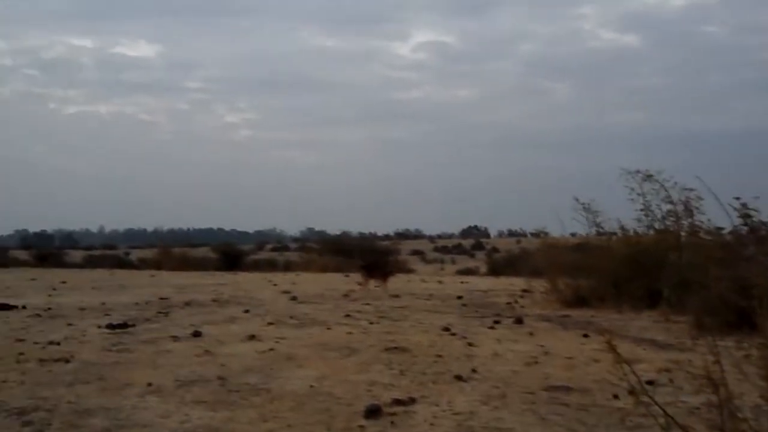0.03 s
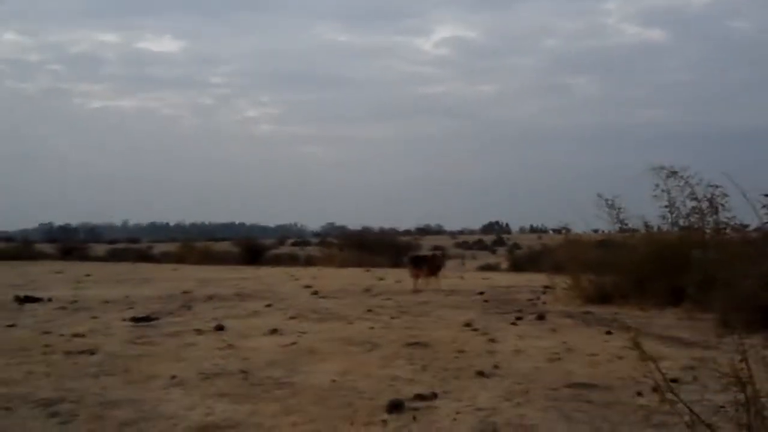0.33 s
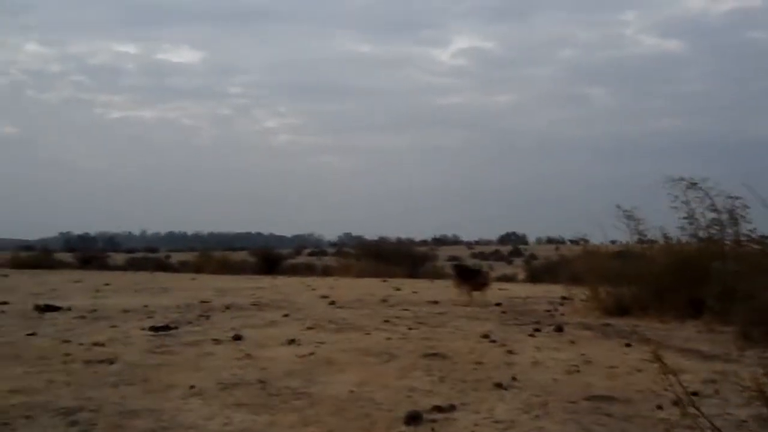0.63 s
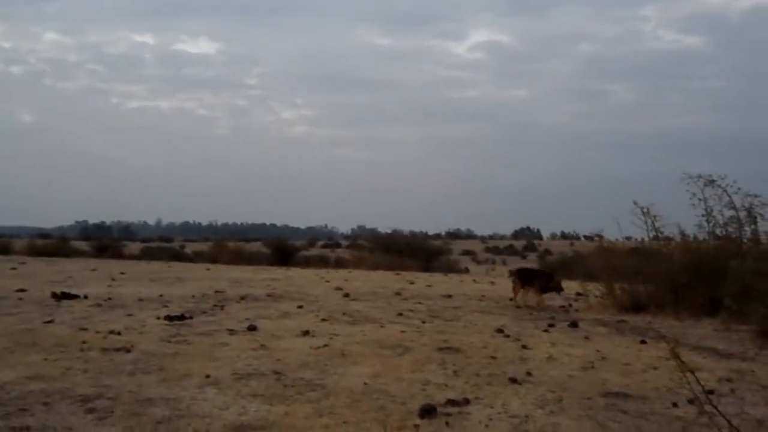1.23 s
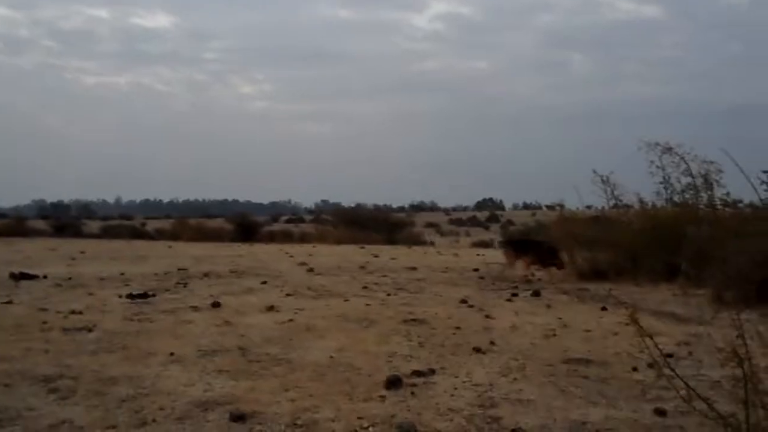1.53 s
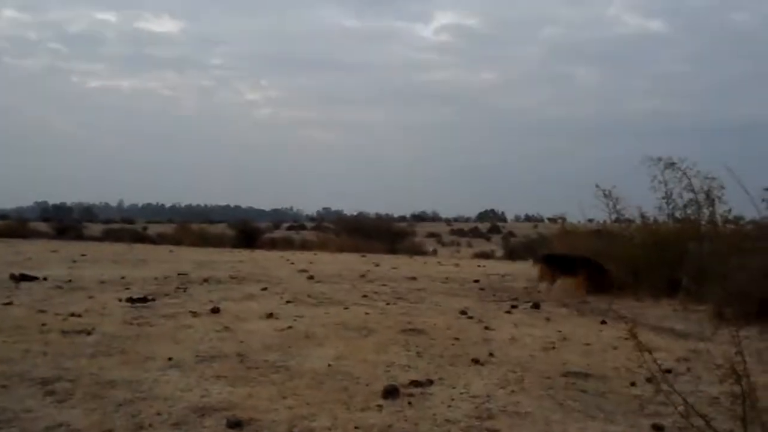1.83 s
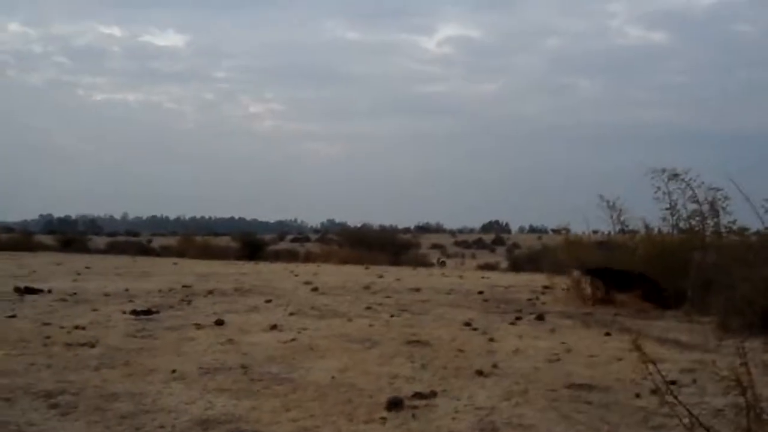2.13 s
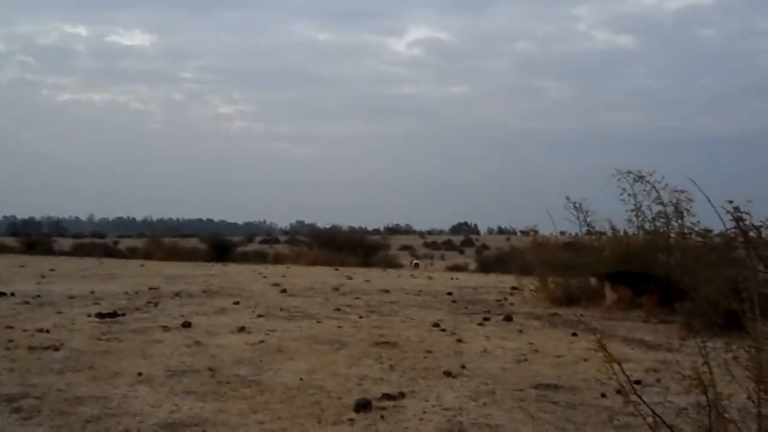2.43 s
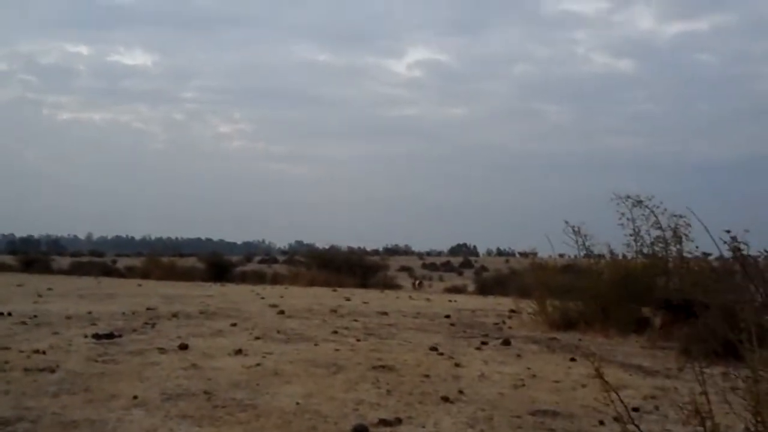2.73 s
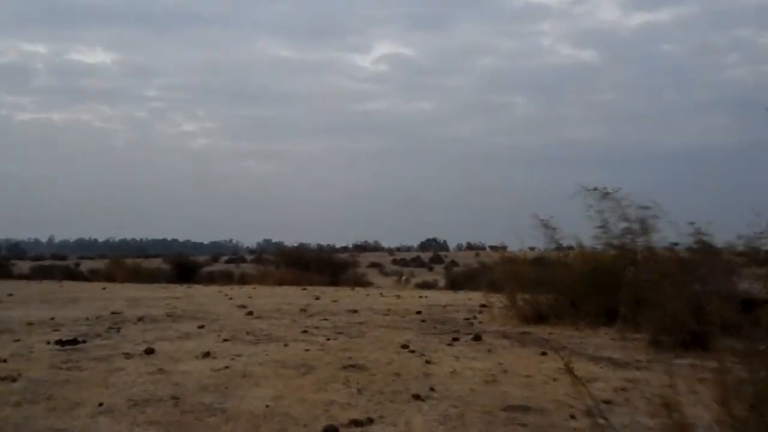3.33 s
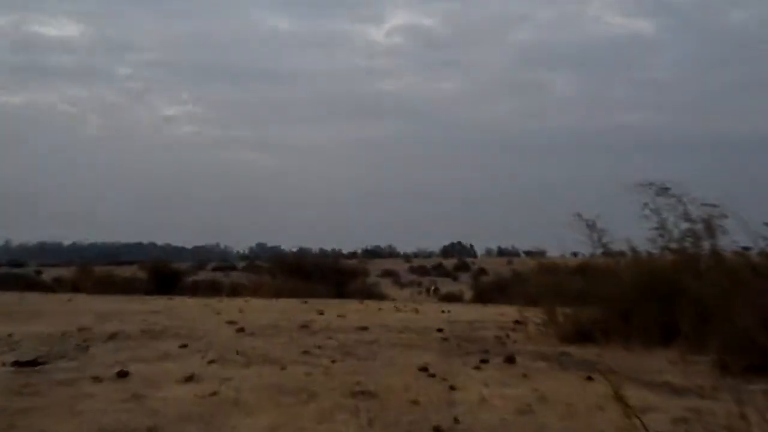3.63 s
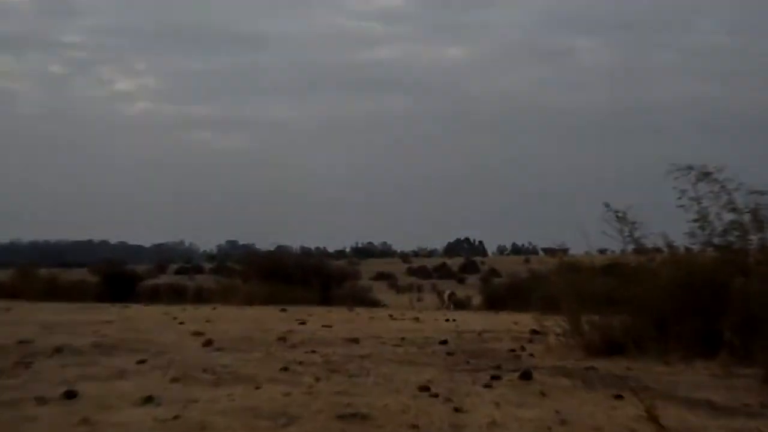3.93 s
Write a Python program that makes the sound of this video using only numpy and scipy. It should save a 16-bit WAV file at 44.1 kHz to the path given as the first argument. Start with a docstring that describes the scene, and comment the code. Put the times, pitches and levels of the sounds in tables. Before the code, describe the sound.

Small zoom motor clatters and whirs, following soft casing ticks and a distant outdoor rumble.

```python
"""Camera zoom in an open field

A quiet open field with a far rumble and engine drone, on the one microphone of a hand-held camera.
Close to the microphone, the casing ticks and rustles under the fingers. Then the zoom motor starts with
a clatter and whirs on: a gear mesh throbs once per turn of a slow wheel, and the motor shaft rasps at
every turn, all through the resonances of the casing."""
import sys
import numpy as np
from scipy import signal
from scipy.fft import rfft, irfft, next_fast_len
from scipy.io import wavfile
from scipy.ndimage import map_coordinates

SR = 44100
rng = np.random.default_rng(int(sys.argv[2]) if len(sys.argv) > 2 else 0)


def wrap_up_sound(samples):
    """Save the sound to the file named by the first command line argument, as 16-bit audio."""
    columns = np.atleast_2d(samples).T
    # keep every value between -1 and 1, then stretch to whole-number steps
    tamed = np.clip(columns, -1, 1)
    steps = np.round(tamed * 32767).astype(np.int16)
    wavfile.write(sys.argv[1], SR, steps)


N = 176400

# motor shaft speed: t/s, f/Hz
SHAFT_SPEED = [(3.31, 200), (3.33, 266), (3.39, 258), (3.42, 247), (3.456, 233), (3.5, 228), (3.56, 229),
               (3.6, 250), (3.63, 266), (3.66, 270), (3.72, 265), (3.78, 259), (3.83, 255), (3.89, 265),
               (3.94, 264), (4.0, 256)]
# load on the gears: t/s, level/dB
GEAR_LOAD = [(3.31, -6.5), (3.42, -5), (3.47, -7.5), (3.53, -3), (3.58, -1), (3.62, -1.5), (3.67, 0),
             (3.76, .5), (3.85, -2), (3.91, 2.5), (3.96, -3), (4.0, -3.5)]
# gear tones, one list each: multiple of the shaft speed; relative level/dB; depth of the throb
GEAR_ORDERS = [2.363, 2.53, 2.863, 3.53, 4.53, 4.86, 6.03, 6.2]
GEAR_LEVELS = [-33, 0, -5.5, -8, -1, -8.5, -9.5, -11]
GEAR_THROBS = [.3, .65, .4, .25, .15, .2, .2, .2]
# response of the casing to the running motor: f/Hz, relative level/dB
CASING_RESPONSE = [(100, -30), (330, -25.5), (490, -15.5), (570, -7), (660, -1), (780, -5.5), (850, -10),
                   (950, -4.5), (1090, -15.5), (1230, -8), (1430, -14.5), (1630, -11.5), (1780, -17.5),
                   (2000, -18.5), (2600, -34), (4000, -43.5)]
# shaft rasp: f/Hz, relative level/dB
RASP_SPECTRUM = [(1200, -24), (2300, -3.5), (2750, -4.5), (3200, 5), (3900, -10.5), (4900, -9.5), (5450, 0),
                 (6100, -2.5), (6950, 3), (7700, -13), (8200, -0.5), (9000, -9.5), (9900, -21),
                 (10900, -12), (11500, -18), (12500, -19), (15500, -26)]
# the gears take up their slack: t/s, clatter level/dB, scrape level/dB
SLACK_LEVELS = [(3.309, -100, -100), (3.312, -44.5, -51), (3.322, -38, -51), (3.332, -35.5, -49.5),
                (3.35, -42, -47.5), (3.363, -39.5, -50.5), (3.374, -43.5, -55), (3.39, -33, -52.5),
                (3.405, -42.5, -68), (3.415, -51, -78), (3.45, -100, -100)]
# clatter and scrape of the lens barrel: f/Hz, relative level/dB
CLATTER_SPECTRUM = [(100, -20), (200, -21), (340, -13.5), (520, -7.5), (740, 1), (1000, -3.5), (1300, -12),
                    (1650, -6.5), (1850, -10.5), (2100, -14.5), (2600, -39), (5000, -51)]
SCRAPE_SPECTRUM = [(1200, -21), (2400, 0.5), (3300, 7), (4000, -2), (5000, -5.5), (5600, 0), (7000, -1.5),
                   (7600, -6.5), (8400, -5), (10500, -17), (13000, -18), (15500, -19)]
# the barrel bumps into its drive: t/s, level/dB
BARREL_BUMPS = [(3.3255, -31), (3.371, -32), (3.3776, -22)]
# modes of the barrel and of the casing: f/Hz, relative level/dB, t60/s
BARREL_MODES = [(205, -13, 0.038), (383, -3, .026), (614, -1, 0.029)]
CASING_MODES = [(377, -14, 0.019), (568, 1, .028), (855, 0, 0.021), (1290, -2, 0.0095), (1810, -1, .011),
                (2520, -2, 0.0095), (3270, -2, 0.0038), (5530, -2.5, 0.0082), (6340, 0, 0.0048),
                (9760, 2, 0.0022), (11300, -15, 0.0046)]
# clicks and knocks on the casing: t/s, then gain/dB at 550, 1800, 3300, 6000 and 12000 Hz
CASING_CLICKS = [(.316, -46.5, -68, -72, -64, -79), (.455, -55.5, -69, -80, -80, -80),
                 (.65, -52.5, -66, -76, -80, -80), (.671, -74, -53, -42.5, -56, -44.5),
                 (1.5958, -61, -42, -52, -50, -65), (1.605, -72, -53, -60, -52, -59),
                 (1.6081, -43, -36.5, -48, -35.5, -49), (1.75, -49, -49.5, -49, -50, -58),
                 (1.7525, -37, -69, -73, -78, -88), (1.7804, -57, -44, -47, -54, -70),
                 (1.789, -63, -52, -52, -58, -75), (2.037, -53, -68, -75, -72, -78),
                 (2.1064, -65, -60, -48, -50.5, -50.5), (3.144, -57, -43.5, -47.5, -47.5, -57),
                 (3.3266, -26, -32.5, -33.5, -33, -46), (3.362, -50, -42, -48, -47, -64),
                 (3.371, -27.5, -46.5, -44, -57, -67), (3.539, -53, -54, -39.5, -41.5, -37.5),
                 (3.804, -44.5, -42, -38, -51, -54), (3.8877, -40, -42, -56, -60, -65),
                 (3.906, -61, -46, -35.5, -53, -50)]
# colour of the crack in each click: f/Hz, gain/dB
CRACK_COLOUR = [(150, -17), (400, -14), (900, -7), (1300, 1), (1800, 0), (2600, 7), (3300, -2),
                (4300, -0.5), (5300, 0.5), (6200, 8), (7800, -3), (10000, 0.5), (12500, 3.5), (15500, -5)]
# finger rubs: t/s, length/s, level/dB
FINGER_RUBS = [(.3, .06, -70), (1.53, 0.092, -69.5), (2.035, 0.14, -72), (2.207, 0.11, -65),
               (2.294, .21, -68), (3.028, 0.15, -69)]
# their rustle: f/Hz, relative level/dB
RUB_SPECTRUM = [(1000, -4.5), (2500, -10), (4200, -15), (5200, -2), (6200, -10), (8000, -15),
                (11500, -13.5), (14000, -11), (15500, -16.5)]
# air over the field: f/Hz, relative level/dB
AIR_SPECTRUM = [(12, -24), (20, -1), (37, 2), (103, -4), (133, -6.5), (157, -7), (196, -9.5), (266, -13),
                (362, -19), (404, -18.5), (465, -21), (631, -21.5), (788, -25.5), (857, -21), (985, -25.5),
                (1070, -25.5), (1160, -27.5), (2090, -34.5), (15500, -42.5)]
# drift of the far rumble: t/s, gain/dB
RUMBLE_DRIFT = [(0, 1), (1.0, 0.5), (1.8, 0.5), (2.2, 0.5), (2.7, -0.5), (3.2, .5), (4, -.5)]


def zoom_motor():
    """Gear tones and grinding swell with the slow wheel and the load; the shaft rasps once a turn."""
    start_s, throb_peak_s = 3.311, 3.773
    run_hz, gear_ratio = 262, 6
    t = clock()
    (shaft_hz,), (load_db,) = curves(SHAFT_SPEED), curves(GEAR_LOAD)
    shaft_turns = np.cumsum(shaft_hz) / SR
    wheel_turns = (shaft_turns - np.interp(throb_peak_s, t, shaft_turns)) / gear_ratio
    mesh = 0
    for order, db, depth in zip(GEAR_ORDERS, GEAR_LEVELS, GEAR_THROBS):
        phase = 2 * np.pi * (order * shaft_turns + rng.random())
        tone = np.sin(phase + 0.14 * wobble(120))  # jitter roughens the tone
        gain = amp(db + along(CASING_RESPONSE, order * shaft_hz))
        mesh += gain * throb(wheel_turns, depth) * tone
    flutter_db = 0.8 * wobble(50)
    gears = mesh / np.std(mesh[t > start_s]) * amp(-42.5 + load_db + flutter_db)
    grind_pulse = throb(wheel_turns, depth=0.15) * throb(shaft_turns, depth=0.41)
    grind = noise(CASING_RESPONSE, grind_pulse) * amp(-46.5 + 0.45 * load_db)
    rasp_db = -60.5 + 6 * np.log2(shaft_hz / run_hz)  # 6 dB per doubling of speed
    rasp = noise(RASP_SPECTRUM, throb(shaft_turns, depth=0.75)) * amp(rasp_db)
    fade_in = np.clip((t - start_s) / 0.015, 0, 1)
    return fade_in * (gears + grind + rasp)


def lens_barrel():
    """Close to the microphone, the barrel clatters, scrapes and bumps as it starts to move."""
    clatter_db, scrape_db = curves(SLACK_LEVELS)
    jolts = amp(2.3 * wobble(500))
    out = amp(clatter_db) * noise(CLATTER_SPECTRUM, jolts)
    out += amp(scrape_db) * noise(SCRAPE_SPECTRUM, jolts)
    for start_s, bump_db in BARREL_BUMPS:
        t = np.maximum(clock() - start_s, 0)
        ring = sum(amp(db - 60 * t / t60) * np.sin(2 * np.pi * hz * t) for hz, db, t60 in BARREL_MODES)
        attack = 1 - np.exp(-t / 0.0008)
        out += amp(bump_db) * ring * attack
    return out


def casing_clicks():
    """Each contact cracks and rings the casing, with its own balance of thud and snap."""
    crack_db, crack_t60_s = 1, 0.0088
    bands_hz = [550, 1800, 3300, 6000, 12000]
    out, t = np.zeros(N + SR), np.arange(SR // 10) / SR
    for start_s, *band_db in CASING_CLICKS:
        ring = 0
        for k, (hz, db, t60) in enumerate(CASING_MODES):
            decay = amp(db + rng.normal(0, 2.0) - 60 * t / t60)
            ring += (-1) ** k * decay * np.sin(2 * np.pi * hz * t)
        burst = amp(crack_db - 60 * t / crack_t60_s) * rng.standard_normal(len(t))
        crack = coloured(burst, CRACK_COLOUR)
        balance = list(zip(bands_hz, band_db))
        out[round(start_s * SR):][:len(t)] += coloured(ring + crack, balance)
    return out[:N]


def finger_rustles():
    """Fingers rub softly on the casing, right by the microphone: short swells of grainy noise."""
    envelope = 0
    for start_s, length_s, db in FINGER_RUBS:
        progress = np.clip((clock() - start_s) / length_s, 0, 1)
        envelope += amp(db) * np.sqrt(np.abs(np.sin(np.pi * progress)))
    grain = amp(1.5 * wobble(300))
    return envelope * noise(RUB_SPECTRUM, grain)


def open_field():
    """Still air over a slowly shifting rumble, with an engine droning far off."""
    rumble_top_hz, engine_hz = 400, 137.1
    air = amp(-52.5) * noise(AIR_SPECTRUM)
    lows = signal.sosfiltfilt(signal.butter(2, rumble_top_hz, fs=SR, output="sos"), air)
    engine = np.sin(2 * np.pi * engine_hz * clock() + 1.13 * wobble(8.3))
    engine *= amp(-63 + 2.5 * wobble(4.91))
    drift_db, = curves(RUMBLE_DRIFT)
    rumble = lows * amp(drift_db + 1.4 * wobble(12))
    return air - lows + rumble + engine


def amp(db):
    """Decibels to gain."""
    return 10 ** (np.asarray(db) / 20)


def unit(x):
    """Scaled to rms 1."""
    return x / np.sqrt(np.mean(x ** 2) + 1e-20)


def clock():
    """Seconds at each sample."""
    return np.arange(N) / SR


def curves(rows):
    """One value per sample for each column after the time."""
    times, *columns = np.transpose(rows)
    return [np.interp(clock(), times, column) for column in columns]


def along(points, hz):
    """Points (f/Hz, level/dB) read on a log frequency axis."""
    freqs, levels = np.transpose(points)
    return np.interp(np.log(hz + 1), np.log(freqs + 1), levels)


def wobble(rate):
    """A smooth random curve, rate knots a second."""
    return map_coordinates(rng.standard_normal(int(N * rate / SR) + 4), [np.arange(N) * rate / SR])


def coloured(x, points):
    """x through a causal filter given as points (f/Hz, gain/dB)."""
    size = 2 * next_fast_len(len(x))
    cepstrum = irfft(np.log(amp(along(points, np.fft.rfftfreq(size, 1 / SR)))))
    cepstrum[1:size // 2] *= 2  # fold to minimum phase
    cepstrum[size // 2 + 1:] = 0
    return irfft(rfft(x, size) * np.exp(rfft(cepstrum)), size)[:len(x)]


def noise(points, gate=1):
    """Gated noise, coloured, at rms 1."""
    return unit(coloured(gate * rng.standard_normal(N), points))


def throb(turns, depth):
    """A swell once per turn, rms 1."""
    return unit(np.exp(depth * np.cos(2 * np.pi * turns)))


def scene():
    """The field and the camera's own close noises at one microphone."""
    return (open_field() + zoom_motor() + lens_barrel() + casing_clicks() + finger_rustles())[None]


def record(dry):
    """The camera keeps nothing above its band limit."""
    top_hz = 15850
    size = next_fast_len(N + SR // 2)
    passband = np.fft.rfftfreq(size, 1 / SR) < top_hz
    return irfft(rfft(dry, size) * passband, size)[..., :N]


dry = scene()
out = record(dry)
wrap_up_sound(out)
```